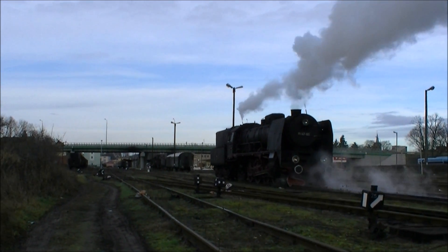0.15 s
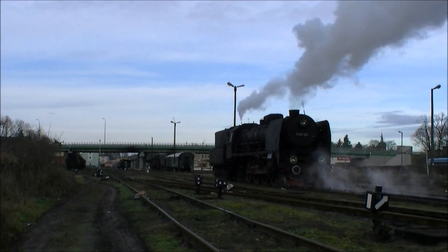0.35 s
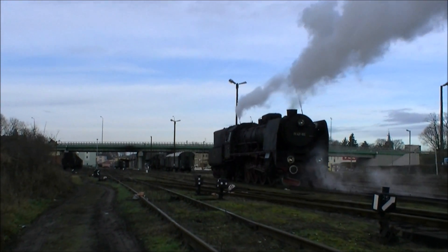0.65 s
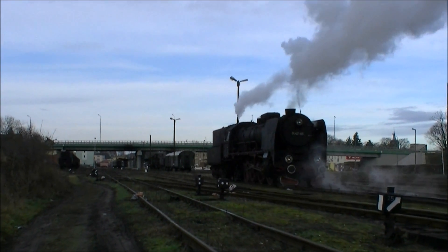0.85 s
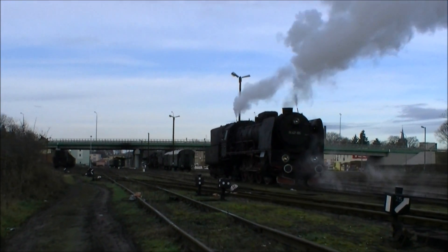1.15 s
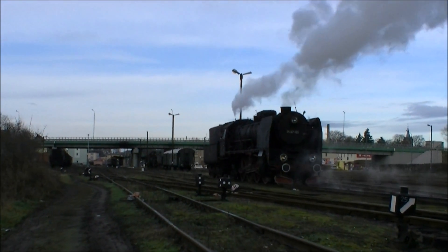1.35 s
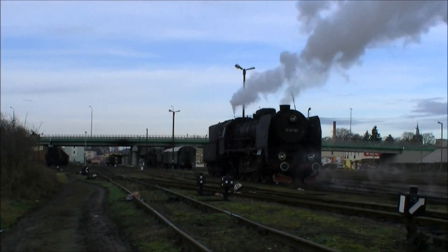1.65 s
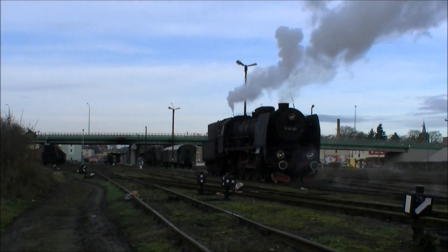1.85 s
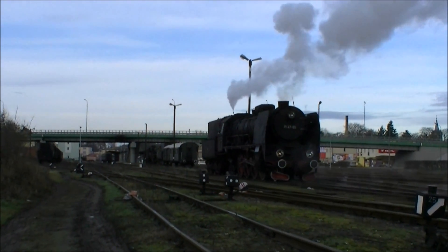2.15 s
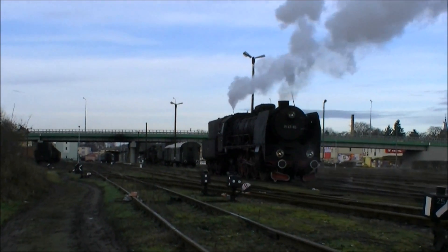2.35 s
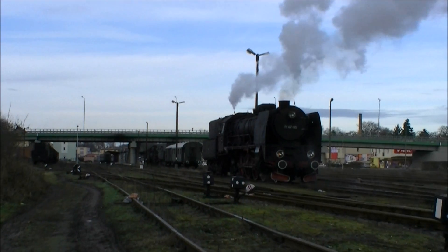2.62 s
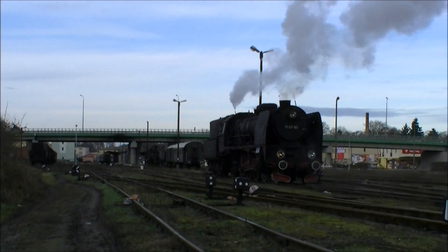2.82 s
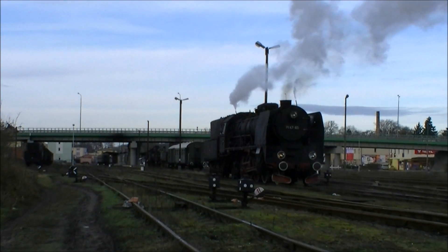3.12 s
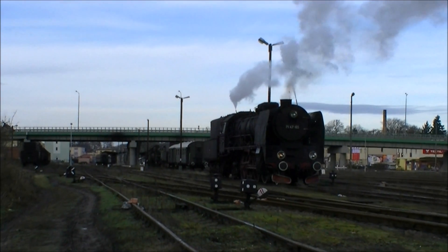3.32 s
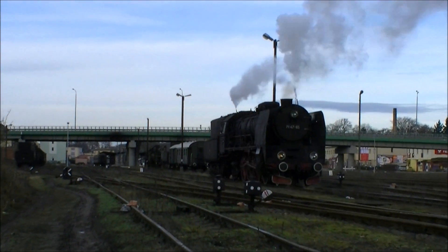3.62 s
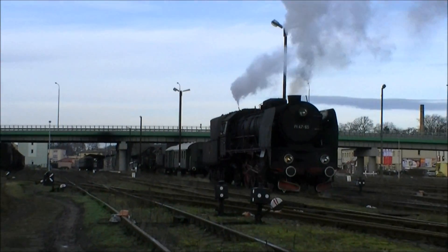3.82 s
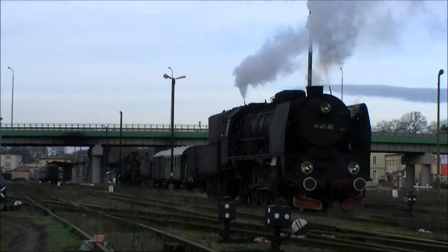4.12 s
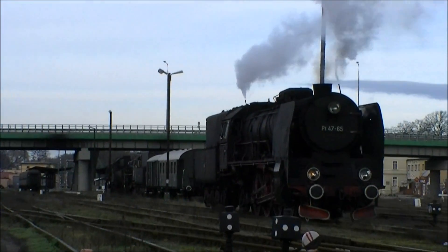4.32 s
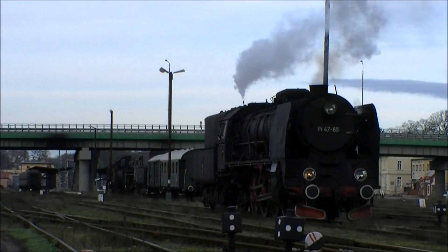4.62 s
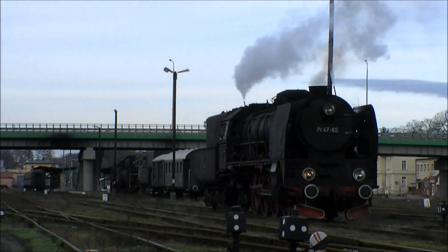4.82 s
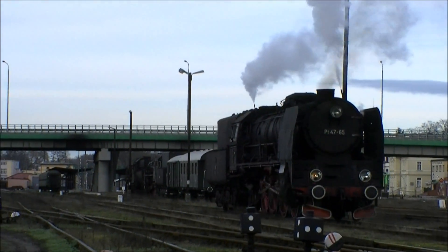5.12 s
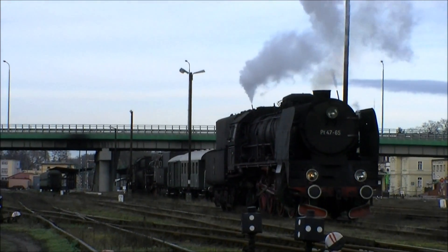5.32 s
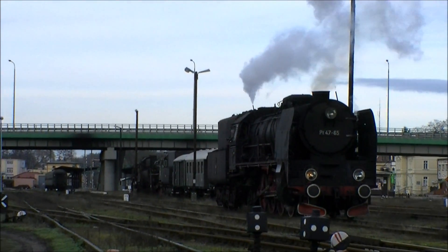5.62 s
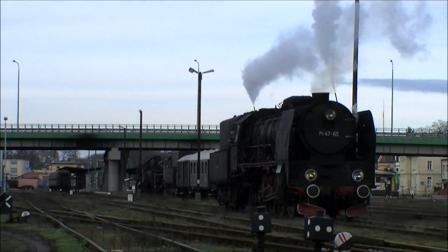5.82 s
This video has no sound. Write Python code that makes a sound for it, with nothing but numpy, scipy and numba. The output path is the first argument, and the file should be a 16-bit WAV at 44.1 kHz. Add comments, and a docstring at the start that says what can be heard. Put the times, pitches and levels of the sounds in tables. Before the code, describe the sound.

Short steam jets burst from a creeping locomotive, singly then in pairs, echoing around a rail yard over constant hiss.

```python
"""Steam blasts from the open cylinder drain cocks of a locomotive creeping closer through a yard.
Three jets per wheel turn, a long one then a close pair, bounce off the ballast and echo round the yard.
Between them the running gear rumbles, the boiler roars, leaks hiss, the turbo-generator whines
and the rods clank. A limiter ducks it all under each blast."""
import sys
import numpy as np
from scipy import signal
from scipy.fft import rfft, irfft
from scipy.io import wavfile
from scipy.ndimage import uniform_filter1d
from numba import njit

SR = 44100
rng = np.random.default_rng(int(sys.argv[2]) if len(sys.argv) > 2 else 0)


def wav_out(sig):
    """Save sig, one row per channel (or a flat mono array), as 16-bit PCM at SR to the path in sys.argv[1]."""
    wavfile.write(sys.argv[1], SR, np.round(np.clip(np.atleast_2d(sig).T, -1, 1) * 32767).astype(np.int16))


N = 262836
T = np.arange(N) / SR
HZ = np.fft.rfftfreq(N, 1 / SR)

# Steady steam. Each row: time in seconds, boiler roar in dB, leak hiss in dB.
STEAM_LEVELS = [(0, -35, -31.5), (.3, -35, -36), (.6, -33.5, -31.5), (1, -34.5, -33.5), (1.55, -32, -31),
                (2.1, -35, -37), (3.3, -33.5, -36.5), (3.75, -36, -40), (4.7, -38, -41), (5.5, -35, -39),
                (5.96, -35, -41)]


def undb(db):
    """Decibels to gain."""
    return 10 ** (np.asarray(db) / 20)


def colour(points):
    """Gain over frequency from (Hz, dB) points, rolled off below 40 Hz."""
    hz, db = np.transpose(points)
    return undb(np.interp(np.log(HZ + 1), np.log(hz), db)) * np.minimum(HZ / 40, 1) ** 2


def resonance(hz, width_hz):
    """Gain over frequency of one resonance."""
    return 1 / (1 + ((HZ - hz) / width_hz * 2) ** 2)


def noise(gain):
    """Unit-rms turbulence with the given gain over frequency."""
    x = irfft(rfft(rng.standard_normal(N)) * gain, N)
    return x / x.std()


def walk(rate_hz):
    """Smooth unit-rms random drift."""
    return noise(1 / (1 + (HZ / rate_hz) ** 4))


def strike(start_s, rise_s, decay_s):
    """Linear rise, exponential decay."""
    age_s = np.maximum(T - start_s, 0)
    return np.minimum(age_s / rise_s, 1) * np.exp(-np.maximum(age_s - rise_s, 0) / decay_s)


def rush(points, flicker_db):
    """Steady flow whose overlapping octave bands flicker independently."""
    octave = np.log2(HZ + 1)
    spectrum = rfft(noise(colour(points)))
    bands = (irfft(spectrum * np.maximum(1 - abs(octave - k), 0), N) for k in range(4, 15))
    return sum(band * undb(flicker_db * walk(18)) for band in bands)


def widen(x, width, scatter_s):
    """Left and right, differing only by scattered sound."""
    scatter = (rng.standard_normal(N) * strike(0, 0.0008, scatter_s))[:SR // 2]
    side = signal.fftconvolve(x, scatter / np.linalg.norm(scatter))[:N]
    side = irfft(rfft(side) * colour(width), N)
    return np.array([x + side, x - side])


def yard_echo(x, wet_db=-15.5, t60_s=1.5, delay_s=0.085):
    """Wagons, bridge and houses scatter back a late, dull echo."""
    # Each row: frequency in Hz, echo gain in dB.
    response = [(150, -20), (500, 5), (1000, 1), (2500, -1), (5000, -2.5), (9000, -12), (15000, -34)]
    tail = noise(np.ones(len(HZ))) * strike(delay_s, 0.045, t60_s / np.log(1000))
    tail = irfft(rfft(tail / np.linalg.norm(tail)) * colour(response), N)[:2 * SR]
    return undb(wet_db) * signal.fftconvolve(x, tail)[:N]


def ballast_comb(notch_hz, share=.36, dull_hz=5500):
    """Comb gain from the late, inverted, dull bounce off the ballast."""
    bounce = share / (1 + (HZ / dull_hz) ** 4)
    return np.abs(1 - bounce * np.exp(-2j * np.pi * HZ / notch_hz))


def running_gear(level_db=-54.5, swell_db=1.9, turn_s=1.68, heaviest_s=1.45):
    """Rumble that swells once per wheel turn as the rods labour."""
    # Each row: frequency in Hz, relative density in dB.
    spectrum = [(8, -55), (25, -30), (36, -24), (50, -21), (75, -11.5), (110, -2.5), (150, 0.5),
                (195, -0.5), (280, -10.5), (450, -4.5), (900, -47)]
    effort = np.cos(2 * np.pi * (T - heaviest_s) / turn_s)
    return rush(spectrum, flicker_db=2.0) * undb(level_db + swell_db * effort)


def generator(drift=0.00085, waver_db=2.5, breath_db=-3, breath_width_hz=110, tone_db=-2):
    """A small turbine holds its speed; its tones waver in a sheath of steam noise."""
    # Each row: frequency in Hz, base level in dB.
    partials = [(2212, -50), (4334, -50), (4436, -48)]
    # Each row: time in seconds, overall gain in dB.
    swell = [(0, -8), (1.2, 3), (2.3, 2.5), (3.8, 3), (4.7, -1.5), (6, -1)]
    rotor_s = np.cumsum(1 + drift * walk(23.5)) / SR
    out = 0
    for hz, db in partials:
        tone = np.sqrt(2) * np.sin(2 * np.pi * hz * rotor_s) * undb(tone_db + waver_db * walk(8))
        breath = undb(breath_db) * noise(resonance(hz, breath_width_hz))
        out += undb(db) * (tone + breath)
    return out * undb(np.interp(T, *np.transpose(swell)))


def leaks():
    """Escaping steam hisses and sings in glands and pipes."""
    # Each row: frequency in Hz, relative hiss density in dB.
    spectrum = [(1500, -23.5), (3300, -7.5), (4400, -6.5), (5400, -6), (6400, -3.5), (7200, -1),
                (8000, -0.5), (9000, -6), (10000, -12), (11200, -12), (12200, -18.5), (13500, -24),
                (15500, -37)]
    # Each row: centre in Hz, width in Hz, peak level in dB, peak time and spread in seconds.
    singing = [(1180, 250, -45, 1.5, 0.22), (1415, 220, -42, 5.45, 2.1), (2290, 260, -41.5, 1.3, 0.35),
               (2240, 180, -45, 3.2, 0.33), (3160, 310, -43, 0.86, 0.83), (10900, 300, -49, 2.7, 0.48),
               (10900, 300, -44, 1.03, .04)]
    times_s, _, hiss_db = np.transpose(STEAM_LEVELS)
    out = rush(spectrum, flicker_db=1.0) * undb(np.interp(T, times_s, hiss_db))
    for hz, width_hz, db, peak_s, spread_s in singing:
        swell = np.exp(-.5 * ((T - peak_s) / spread_s) ** 2)
        out += noise(resonance(hz, width_hz)) * undb(db) * swell
    return out


def boiler():
    """The draught roars through the boiler."""
    # Each row: frequency in Hz, relative density in dB.
    spectrum = [(200, -21.5), (380, -12), (620, -6), (850, 0.5), (1150, 1.5), (1750, -1), (2300, 1.5),
                (3000, 0.5), (3700, -3.5), (4400, -5.5), (5200, -9), (9000, -79)]
    times_s, roar_db, _ = np.transpose(STEAM_LEVELS)
    return rush(spectrum, flicker_db=1.0) * undb(np.interp(T, times_s, roar_db))


def knocks(ring_decay_s=0.0061, ring_width_hz=90):
    """Slack rods clank with a short steel ring; a wheel thuds over a rail joint."""
    # Each row: start in seconds, level in dB, decay in seconds, ring in Hz, relative ring level in dB.
    clanks = [(1.593, -21, 0.0081, 2900, -10), (3.045, -21.5, 0.0059, 2530, -3),
              (4.35, -17, 0.0012, 8740, -22), (4.520, -31, .012, 7800, 2)]
    # Each row: frequency in Hz, relative density in dB.
    crack_spectrum = [(500, -41), (1200, -2), (2000, -2), (2650, 4.5), (3600, -3), (5400, -5.5),
                      (8000, -10), (11000, -17), (15000, -32)]
    # Each row: start in seconds, level in dB, decay in seconds.
    thuds = [(4.84, -44, 0.022)]
    out = 0
    for start_s, db, decay_s, ring_hz, ring_db in clanks:
        crack = noise(colour(crack_spectrum)) * strike(start_s, 0.0035, decay_s)
        ring = noise(resonance(ring_hz, ring_width_hz)) * strike(start_s, .002, ring_decay_s)
        out += undb(db) * (crack + undb(ring_db) * ring)
    for start_s, db, decay_s in thuds:
        out += undb(db) * noise(resonance(hz=170, width_hz=160)) * strike(start_s, 0.0036, decay_s)
    return out


def drain_cocks(weep_db=-27, weep_s=.025, bark_decay_s=.0061, push_db=1.2, sag_ease_per_s=.045,
                sputter_db=0.38, billow_db=1.1):
    """Each port weeps, then barks open; the jet sags, the piston pushes once more, the valve shuts."""
    # Each row: start in seconds, hiss in dB, plume roar in dB, open time in seconds, cock name.
    blasts = [(0.044, -6.5, -21.5, .084, "second of pair"), (0.690, -4, -22, .11, "lone"),
              (1.661, -2.5, -20, .049, "first of pair"), (1.784, -6.5, -17, .082, "second of pair"),
              (2.444, -3.5, -17, .122, "lone"), (3.360, -4.5, -24, .049, "first of pair"),
              (3.481, -6.5, -24, .116, "second of pair"), (4.118, -8, -21, .122, "lone"),
              (5.029, -2.5, -18, .06, "first of pair"), (5.157, -6.5, -19.5, .1, "second of pair"),
              (5.841, -4.5, -21, .115, "lone")]
    # Each cock: rise in seconds, base pressure sag and closing in dB/s, bark relative to hiss in dB.
    cocks = {"lone": (.02, 100, 215, -13.5), "first of pair": (.013, 155, 600, -14),
             "second of pair": (.013, 112, 165, -20)}
    # Jet hiss and plume roar. Each row: frequency in Hz, relative density in dB.
    jet_spectrum = [(500, -35.5), (1500, -14.5), (2400, -6.5), (3200, -11), (3900, -4.5), (5000, -4.5),
                    (6200, -4.5), (7000, -2.5), (7800, 0.5), (9000, -5.5), (10200, -12.5), (11500, -17),
                    (13500, -26.5), (15500, -60)]
    plume_spectrum = [(100, -17), (280, -30.5), (430, -11.5), (620, -12.5), (850, -2), (1350, 5),
                      (2200, -5), (3500, 5), (8000, -28)]
    out = 0
    for start_s, hiss_db, roar_db, open_s, cock in blasts:
        rise_s, sag_db_per_s, close_db_per_s, bark_db = cocks[cock]
        age_s = np.maximum(T - start_s, 0)
        push = undb(push_db * np.clip(2 * age_s / open_s - 1, 0, 1))
        opening = np.sin(np.pi / 2 * np.minimum(age_s / rise_s, 1)) ** 2 * push
        # Pressure holds better as the engine gathers way.
        sag_db = sag_db_per_s * np.exp(-sag_ease_per_s * start_s) * np.minimum(age_s, open_s)
        closing_db = close_db_per_s * np.maximum(age_s - open_s, 0)
        weep = undb(weep_db) * np.exp(-abs(T - start_s) / weep_s)
        jet = undb(hiss_db) * (weep + opening * undb(-sag_db - closing_db))
        # The plume's large, slow eddies outlast the hiss at the nozzle.
        plume = opening * undb(roar_db - 0.42 * sag_db - 0.65 * closing_db)
        bark = undb(hiss_db + bark_db) * strike(start_s, rise_s / 2, bark_decay_s)
        comb = ballast_comb(notch_hz=1290 + 87 * start_s)  # climbs as the engine nears
        out += noise(colour(jet_spectrum) * comb) * jet
        out += noise(colour(plume_spectrum) * comb) * (plume + bark)
    # Condensed water makes the jets sputter.
    return out * undb(sputter_db * walk(160) + billow_db * walk(33))


def scene(left_db=-0.2):
    """Narrow blasts and knocks ahead, wider noise along the engine, echo from all sides."""
    # Stereo widths. Each row: frequency in Hz, side minus mid in dB.
    blast_width = [(100, -32), (300, -50), (600, -43), (900, -63), (1400, -84), (2000, -28), (3300, -27),
                   (5500, -20), (7500, -19.5), (8800, -9.5), (11500, -23), (15000, -34)]
    running_width = [(50, -11), (150, -13.5), (350, -9.5), (600, -11.5), (900, -16.5), (1400, -18),
                     (1900, -13), (2800, -16.5), (5000, -17), (7300, -19.5), (8900, -11), (11000, -20),
                     (13000, -36)]
    echo_width = [(500, -13), (1200, -10), (2000, -6), (5000, -4.5), (7300, -2), (9000, 2), (12000, -8)]
    bursts = drain_cocks() + knocks()
    running = running_gear() + generator() + leaks() + boiler()
    engine = widen(bursts, blast_width, scatter_s=0.012) + widen(running, running_width, scatter_s=.04)
    echo_mid = yard_echo(bursts)
    echo_side = irfft(rfft(yard_echo(bursts)) * colour(echo_width), N)
    echo = np.array([echo_mid + echo_side, echo_mid - echo_side])
    return (engine + echo) * undb([[left_db], [0]])


@njit
def follow(x, level, attack, release):
    """Level follower with separate rise and fall rates per sample."""
    out = np.empty(len(x))
    for i in range(len(x)):
        level += (x[i] - level) * (attack if x[i] > level else release)
        out[i] = level
    return out


def record(dry, knee_db=-11.0, attack_s=0.0014, release_s=0.23, start_db=-6.0, low_hz=40, top_hz=15600):
    """A limiter, already down at the start, ducks under each blast; then clipping and band limits."""
    power = uniform_filter1d(np.mean(dry ** 2, axis=0), size=SR // 300)
    level = follow(np.sqrt(np.abs(power)), float(undb(start_db)), 1 / (attack_s * SR), 1 / (release_s * SR))
    gain = np.maximum(level / undb(knee_db), 1) ** -.9
    limited = np.clip(dry * gain, -.88, .88)
    limited = signal.sosfilt(signal.butter(4, low_hz, "high", fs=SR, output="sos"), limited)
    return signal.sosfilt(signal.ellip(8, .2, 70, top_hz, fs=SR, output="sos"), limited)


dry = scene()
out = record(dry)
wav_out(out)
```